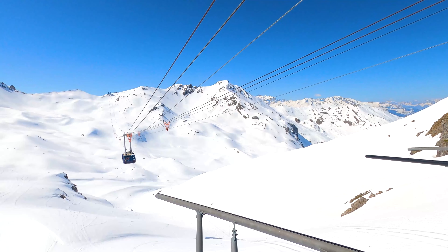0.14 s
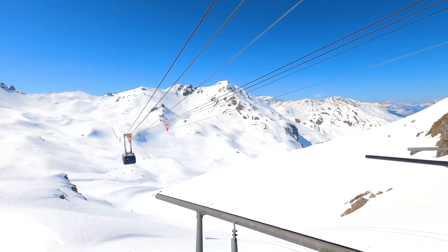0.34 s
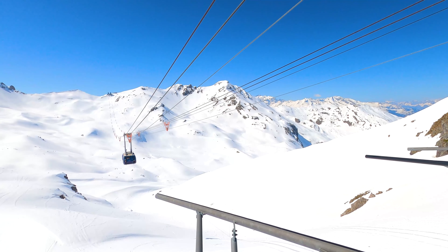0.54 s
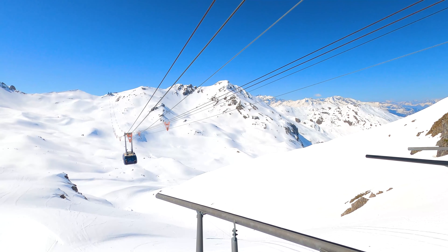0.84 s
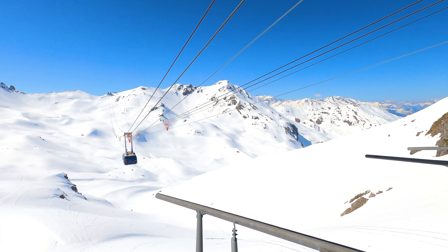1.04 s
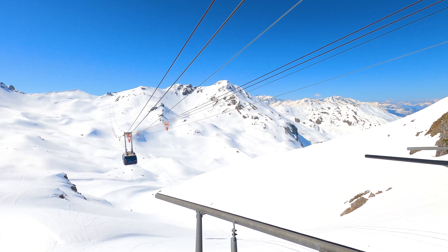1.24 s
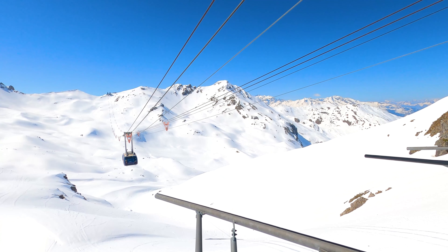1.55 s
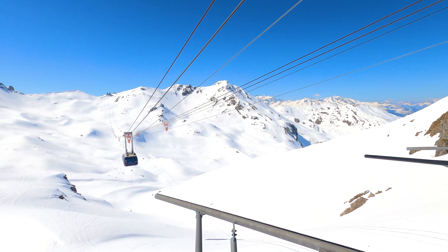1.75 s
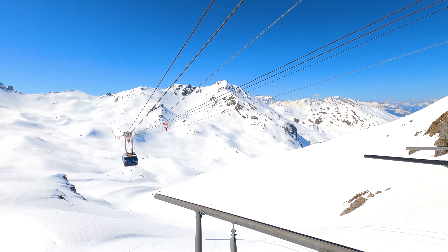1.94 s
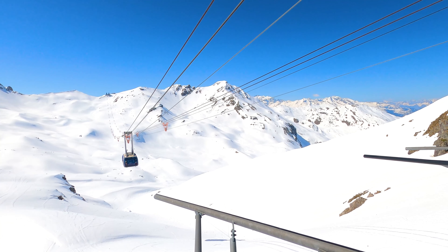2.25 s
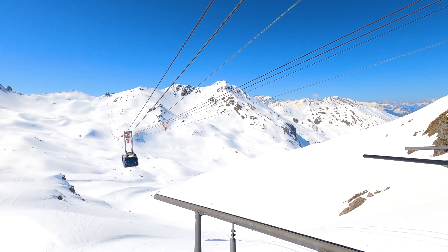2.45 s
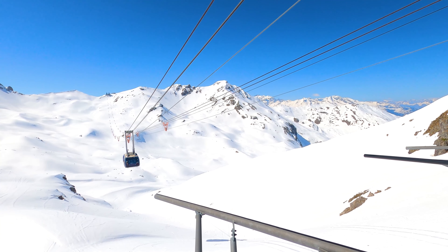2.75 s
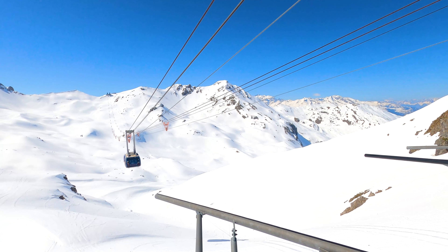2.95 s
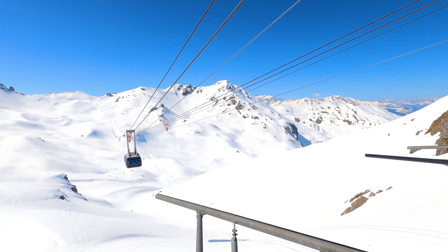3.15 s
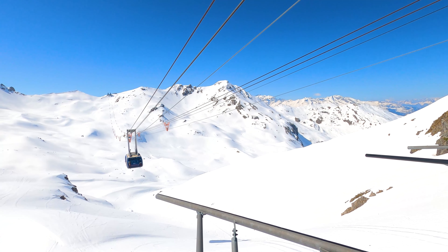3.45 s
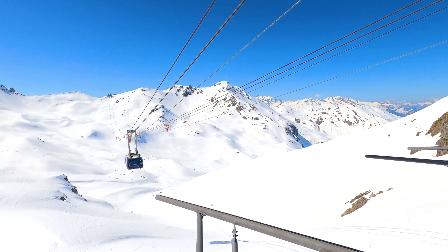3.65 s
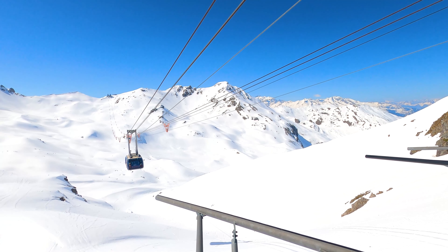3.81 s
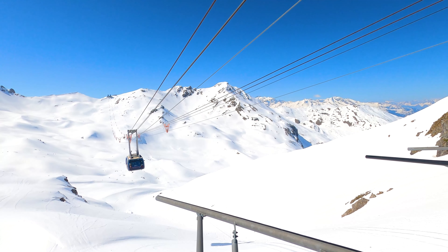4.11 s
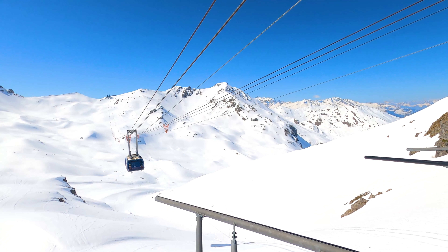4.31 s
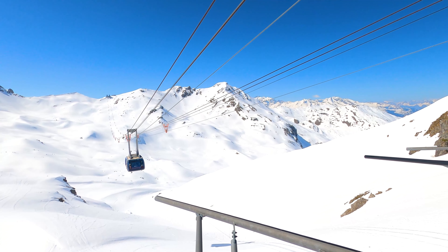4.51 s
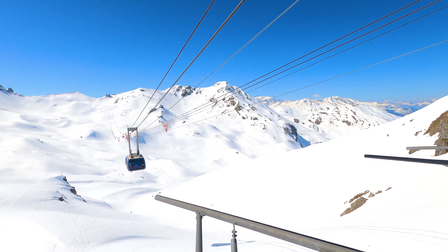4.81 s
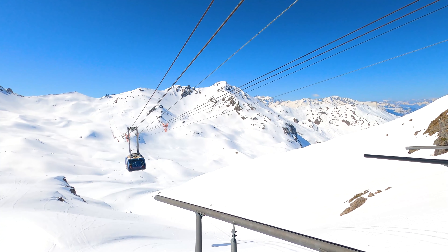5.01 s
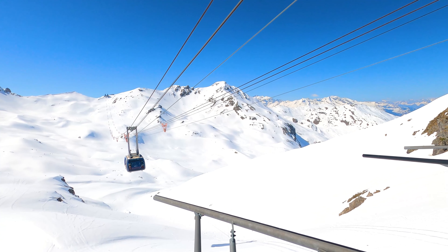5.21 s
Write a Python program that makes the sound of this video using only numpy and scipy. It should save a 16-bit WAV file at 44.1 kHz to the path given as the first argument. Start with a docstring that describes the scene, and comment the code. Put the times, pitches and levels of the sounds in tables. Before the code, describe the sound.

The loud, deep hum of a slowing cable car rope swells and fades, with wind-like rumble, hiss and one brief buzz.

```python
"""The haul rope of a cable car hums as the car creeps towards an open mountain station.
Its twisted strands drum over the sheaves (the wheels that carry it), so the loud hum sinks in
pitch as the drive slows down; it also swells and fades. Behind it is a low, gusty rumble like wind.
The running rope rushes and hisses, a sheave gives a few thin squeaks, and once the rope buzzes
against a rim. The sound starts in the centre and later spreads between the ears."""
import sys
import numpy as np
from scipy import signal
from scipy.fft import rfft, irfft
from scipy.io import wavfile

SR = 44100
rng = np.random.default_rng(int(sys.argv[2]) if len(sys.argv) > 2 else 0)


def to_wav(sig):
    """Store sig (one row per channel, or 1-D mono) as 16-bit WAV at the path in sys.argv[1].

    Samples outside -1..1 are clipped; the rate is SR.
    """
    pcm = np.clip(np.atleast_2d(sig), -1, 1) * 32767
    pcm = np.round(pcm).astype(np.int16)
    wavfile.write(sys.argv[1], SR, pcm.T)  # frames by channels


N = 258867
T = np.arange(N) / SR
FREQ = np.maximum(np.fft.rfftfreq(N, 1 / SR), 1)

# The slowing rope. Each row: time in seconds, strands passing a sheave per second.
ROPE_SPEED = [(0.2, 137.2), (3.0, 122.1), (5.87, 105.6)]
# How hard the rope rubs in the grooves. Each row: time in seconds, load in dB.
ROPE_LOAD = [(0.3, -41.5), (0.9, -41), (1.09, -47.5), (1.84, -50), (2.49, -46.5), (2.89, -47),
             (3.48, -45.5), (3.6, -42.5), (3.71, -42), (4.06, -46.5), (4.74, -49.5), (5.07, -43),
             (5.22, -43.5), (5.24, -47.5), (5.5, -44.5), (5.62, -46), (5.84, -40.5)]
# The tone colours of five noises. Each row: frequency in Hz, relative level in dB.
RUMBLE_COLOUR = [(10, -11.5), (22, -1), (40, 0), (65, 2), (100, 2), (160, -2.5), (220, -10.5), (400, -34)]
ROAR_COLOUR = [(120, 7.5), (200, 4), (300, 4), (440, -1.5), (580, -7), (660, -2), (800, -8), (1100, -16.5),
               (2000, -59.5)]
RUSH_COLOUR = [(500, -15), (950, 1), (1300, 0.5), (1650, 0), (2300, -0.5), (2800, -2.5), (3100, -3.5),
               (3500, -4), (4300, -13), (5500, -33.5), (8000, -52)]
HISS_COLOUR = [(3000, -1.5), (4500, -1), (5600, 0.5), (6500, -4.5), (7500, -11), (8300, -18.5),
               (10000, -30), (12000, -48)]
SCUFF_COLOUR = [(3000, -24), (5500, 1), (7000, -2), (7650, -1), (8300, -9), (10000, -17), (12000, -26.5)]
# Brief gusts. Each row: time of the peak in seconds, lift of the rumble in dB.
GUSTS = [(1.1, 5.5), (2.8, 9), (3.17, 12), (4.17, 12), (4.52, 7)]
# Steelwork rings along with the rope noise. Each row: frequency in Hz, width in Hz, boost or cut in dB.
STEEL_RINGS = [(615, 27, 5), (1634, 30, 4.5), (1900, 5, 3.5), (2715, 19, 9.5), (2937, 170, 4.5),
               (3570, 37, -0.5), (5800, 30, -2)]
# The rope scuffs a sheave. Each row: time of the peak in seconds, level in dB,
# half length in seconds, share of ringing from 0 to 1.
SQUEAKS = [(.84, -69, .05, 0.03), (1.432, -62, .035, 0.26), (2.3, -64, .04, 0.03), (2.5, -64, .04, 0),
           (3.38, -62, .022, .2), (3.7, -65.5, .11, 0.15), (4.4, -72.5, .04, .05), (5.055, -72, .025, .05),
           (5.166, -51.5, .019, 0.9), (5.225, -62, .03, .95), (5.81, -65, .05, .05)]
# The ringing of that sheave. Each row: frequency in Hz, width in Hz, relative level in dB.
SHEAVE_RINGS = [(5765, 80, 0), (6880, 120, -6), (7028, 40, 5), (7300, 200, -10), (7880, 120, -5),
                (10500, 500, -33)]
# The tones of the buzz. Each row: multiple of the chatter rate, relative level in dB.
BUZZ_TONES = [(4, -1), (6, -0.5), (7, 1), (8, -14), (9, -14), (10, -8.5), (13, -8), (14, -11.5), (16, -9.5),
              (19, -13), (29, -10), (31, -17)]
# The grinding that goes with the buzz. Each row: frequency in Hz, relative level in dB.
GRIND_COLOUR = [(300, -25), (700, -7), (1000, 1), (1600, -4.5), (2200, -6.5), (3000, -19.5)]
# The hum's deepest tone and the octave above it. Each row: time in seconds, level in dB.
DEEP_LEVEL = [(0.27, -23.5), (0.91, -15.5), (1.19, -18), (1.73, -17), (1.93, -22), (2.06, -32.5),
              (2.23, -21), (2.34, -36), (2.38, -24), (2.49, -22.5), (2.6, -35.5), (2.8, -28), (2.89, -30),
              (3.28, -17), (3.63, -20.5), (4.31, -15.5), (4.79, -24), (4.85, -30), (5.02, -20.5),
              (5.2, -20), (5.32, -35), (5.38, -27), (5.79, -17.5), (5.85, -19)]
OCTAVE_LEVEL = [(0.27, -30), (0.55, -23.5), (0.61, -35), (1.38, -33.5), (1.55, -41.5), (2.25, -31),
                (2.62, -44.5), (2.72, -30.5), (3.94, -28.5), (4.48, -41.5), (5.29, -30), (5.37, -44.5),
                (5.47, -33), (5.78, -31.5), (5.83, -35)]
# The hum's higher tones. Each row: multiple of the strand rate, relative level in dB.
KNOCK_TONES = [(4, 1), (5, -3), (6, -5.5)]
# The frame lifts tones that sink through these pitches. Each row: pitch in Hz, width in Hz, boost in dB.
FRAME_RINGS = [(318, 4.4, 5.5), (342, 6.8, 6), (358.8, 5.1, 10), (405, 7, 6), (540.7, 14, 4),
               (652, 27, 3.5)]
# How wide the noises are at full spread. Each row: frequency in Hz, side level minus middle level in dB.
STEREO_WIDTH = [(25, -3), (60, -7), (120, -14.5), (300, -41.5), (530, -32.5), (910, -22), (1580, -11),
                (2720, -7), (4680, 1), (8070, -2.5)]
# How far they lean left at full spread. Each row: frequency in Hz, left minus right in dB.
LEFT_LEAN = [(850, 0), (1600, 2), (2700, 2.5), (4500, 6.5), (7500, 0)]
# The sound opens out. Each row: time in seconds, spread from 0 (centre) to 1 (full).
SPREAD = [(2.9, 0.01), (3.2, 0.32), (3.7, 0.5), (4.3, 0.9), (5, .85), (5.5, 1)]

# How a layer follows the rope. Each holds: gain in dB at average load and speed,
# dB added per dB of load, dB added per extra strand per second.
RUMBLE_LAW, ROAR_LAW = (-42.5, 0.55, 0.04), (-36, 0.6, 0.24)
RUSH_LAW, HISS_LAW = (-45.5, 0.91, 0.0091), (-56, 0.85, -0.087)
THIRD_LAW, KNOCK_LAW = (-48.5, 0.7, -0.14), (-53, 0.6, 0.2)


def undb(db):
    """Turn decibels into a gain to multiply by."""
    return 10 ** (np.asarray(db) / 20)


def curve(table):
    """Join (time, value) points with straight lines."""
    return np.interp(T, *np.transpose(table))


def ramp(start_s, length_s):
    """A straight rise from 0 to 1."""
    return np.clip((T - start_s) / length_s, 0, 1)


def bump(peak_s, half_length_s):
    """A smooth rise to 1 and back, shaped like a bell."""
    return np.exp(-.5 * ((T - peak_s) / half_length_s) ** 2)


def colour(points):
    """The gain at every frequency, from (Hz, dB) points."""
    hz, db = np.transpose(points)
    return undb(np.interp(np.log(FREQ), np.log(hz), db))


def band(points):
    """A tone colour that dies away steeply above its last point."""
    return colour(points) / (1 + (FREQ / (1.1 * points[-1][0])) ** 8)


def resonance(hz, rings):
    """The gain steel gives a frequency: close to 1, except near the pitches where it rings."""
    return 1 + sum((undb(db) - 1) / (1 + (2 * (hz - centre) / width) ** 2) for centre, width, db in rings)


def wander(rate_hz):
    """A random wobble of typical size 1, mostly slower than the given rate."""
    wobble = irfft(rfft(rng.standard_normal(N)) / (1 + (FREQ / rate_hz) ** 4), N)
    return wobble / wobble.std()


def stereo_noise(gain):
    """Noise: wide in the deep bass, central in the low middle, wide and leaning left in the treble."""
    mid, side = rfft(rng.standard_normal((2, N))) * gain
    side = side * colour(STEREO_WIDTH)
    lean = np.sqrt(colour(LEFT_LEAN))
    pair = irfft(np.array([(mid + side) * lean, (mid - side) / lean]), N)
    return pair / pair.mean(axis=0).std()


def rough_tone(phase, rough, rough_hz):
    """One tone; uneven strands blur its level and timing."""
    tone = (1 + rough * wander(rough_hz)) * np.sin(phase)
    blur = rough * wander(rough_hz) * np.cos(phase)
    return np.sqrt(2 / (1 + 2 * rough ** 2)) * (tone + blur)


def follow_rope(law):
    """The gain in dB of a layer that changes with the rope's load and speed."""
    db, per_load, per_speed = law
    load, speed = curve(ROPE_LOAD), curve(ROPE_SPEED)
    return db + per_load * (load - load.mean()) + per_speed * (speed - speed.mean())


def wind_rumble():
    """A low rumble, like wind buffeting the microphone, with a few brief gusts."""
    gust_db = sum(db * bump(peak_s, half_length_s=0.06) for peak_s, db in GUSTS)
    level_db = follow_rope(RUMBLE_LAW) + gust_db + 1.5 * wander(12)
    return undb(level_db) * stereo_noise(band(RUMBLE_COLOUR))


def rope_rush(strand_phase):
    """Wires roll and rub in the grooves, pulsing a little with each strand; the steelwork rings along."""
    pulse = 1 + 0.051 * np.sin(strand_phase)
    steel = resonance(FREQ, STEEL_RINGS)
    roar = undb(follow_rope(ROAR_LAW) + 1.4 * wander(21)) * stereo_noise(steel * band(ROAR_COLOUR))
    rush = undb(follow_rope(RUSH_LAW) + 0.53 * wander(8.2)) * stereo_noise(steel * band(RUSH_COLOUR))
    hiss = undb(follow_rope(HISS_LAW) + .5 * wander(13)) * stereo_noise(steel * band(HISS_COLOUR))
    return pulse * (roar + rush + hiss)


def sheave_squeaks():
    """Brief rubs of the rope hiss, and some set a steel sheave ringing at its high pitches."""
    peaks = sum(undb(db) / (1 + (2 * (FREQ - hz) / width) ** 2) for hz, width, db in SHEAVE_RINGS)
    ring = stereo_noise(peaks)
    scuff = undb(2.5 * wander(60)) * stereo_noise(band(SCUFF_COLOUR))
    squeaks = 0
    for peak_s, db, half_length_s, share in SQUEAKS:
        rub = undb(db) * bump(peak_s, half_length_s)
        squeaks = squeaks + rub * (np.sqrt(share) * ring + np.sqrt(1 - share) * scuff)
    return squeaks


def rim_buzz():
    """The rope leans on a sheave's rim for a moment: it chatters at a steady rate and grinds."""
    chatter_hz, gain_db = 119.45, -46.5
    start_s, rise_s, hold_s, fall_s = 3.4, 0.18, 0.2, 0.33
    phase = 2 * np.pi * chatter_hz * T
    tones = sum(undb(db) * rough_tone(k * phase, rough=.2, rough_hz=7.6) for k, db in BUZZ_TONES)
    grind = undb(3.0) * stereo_noise(band(GRIND_COLOUR))
    swell = ramp(start_s, rise_s) - ramp(start_s + rise_s + hold_s, fall_s)
    return undb(gain_db) * swell * (tones + grind)


def sheave_flutter(strand_phase):
    """A sheave that is not quite round shakes the hum's level once a turn: hard at first, then gently."""
    strands_per_turn, first_depth, settled_depth = 6, 0.39, 0.048
    depth = first_depth + (settled_depth - first_depth) * ramp(start_s=0.37, length_s=0.13)
    flutter = 1 + depth * np.sin(strand_phase / strands_per_turn + 0.65 * wander(7.2))
    return flutter / np.sqrt(1 + depth ** 2 / 2)  # keeps the average power steady


def strand_hum(strand_hz, phase):
    """The rope's strands drum on the sheaves; all the tones sink together as the rope slows."""
    flutter = sheave_flutter(phase)
    deep = undb(curve(DEEP_LEVEL)) * rough_tone(phase, rough=0.081, rough_hz=38)
    octave = undb(curve(OCTAVE_LEVEL)) * rough_tone(2 * phase, rough=0.26, rough_hz=24.8)
    third_gain = undb(follow_rope(THIRD_LAW)) * resonance(3 * strand_hz, FRAME_RINGS)
    third = third_gain * rough_tone(3 * phase, rough=0.53, rough_hz=13)
    knock = 0
    for k, db in KNOCK_TONES:
        gain = undb(follow_rope(KNOCK_LAW) + db) * resonance(k * strand_hz, FRAME_RINGS)
        knock = knock + gain * rough_tone(k * phase, rough=0.74, rough_hz=9.6)
    return flutter * (deep + octave + third + knock)


def scene():
    """Add up all the sources; the hum and the rush share the beat of the strands."""
    strand_hz = curve(ROPE_SPEED)
    phase = 2 * np.pi * np.cumsum(strand_hz) / SR  # one cycle for each passing strand
    return strand_hum(strand_hz, phase) + rim_buzz() + rope_rush(phase) + wind_rumble() + sheave_squeaks()


def record(dry):
    """The sound fades in quickly, stays central, then spreads out; the highest treble is cut."""
    top_hz = 11900
    fade_in = np.sin(np.pi / 2 * ramp(start_s=0.2, length_s=0.092)) ** 4
    mid = dry.mean(axis=0)
    pair = mid + curve(SPREAD) * (dry - mid)
    treble_cut = signal.ellip(8, .2, 70, top_hz, fs=SR, output="sos")
    return signal.sosfilt(treble_cut, pair * fade_in)


dry = scene()
out = record(dry)
to_wav(out)
```